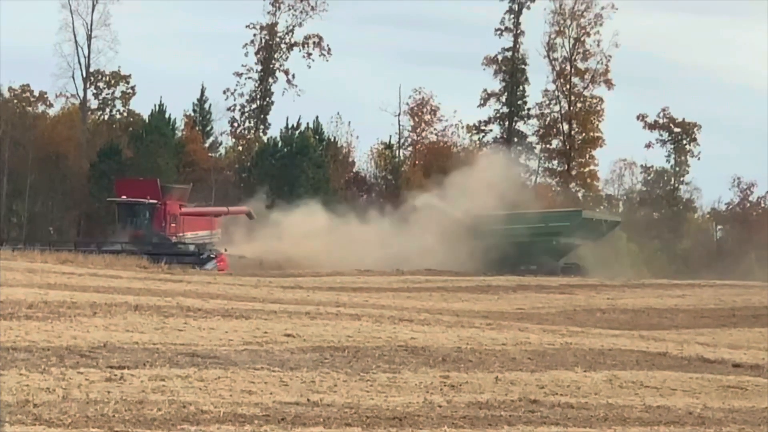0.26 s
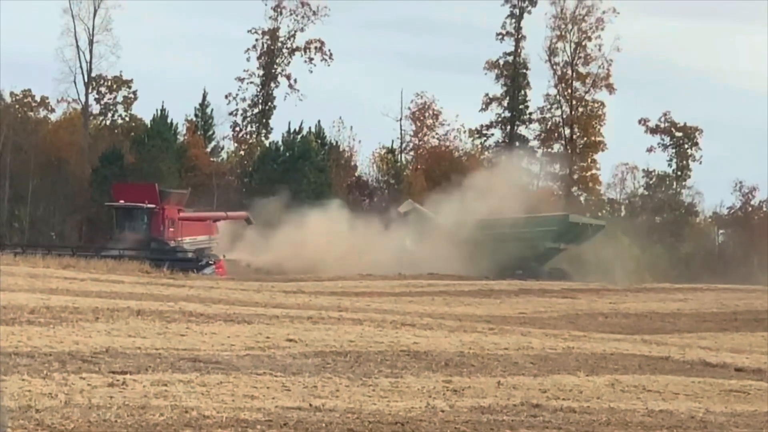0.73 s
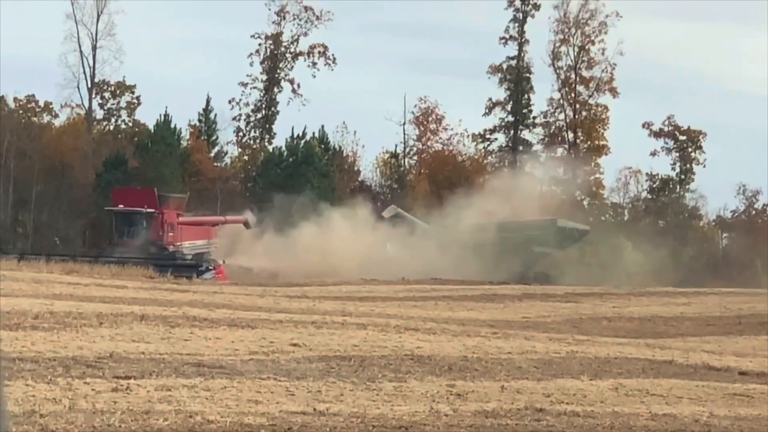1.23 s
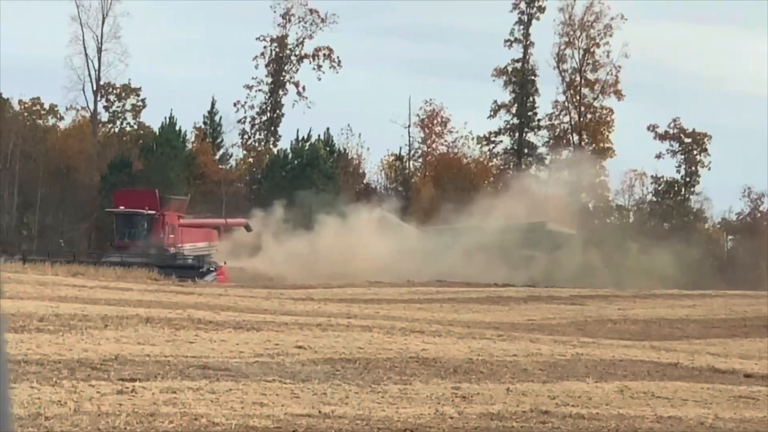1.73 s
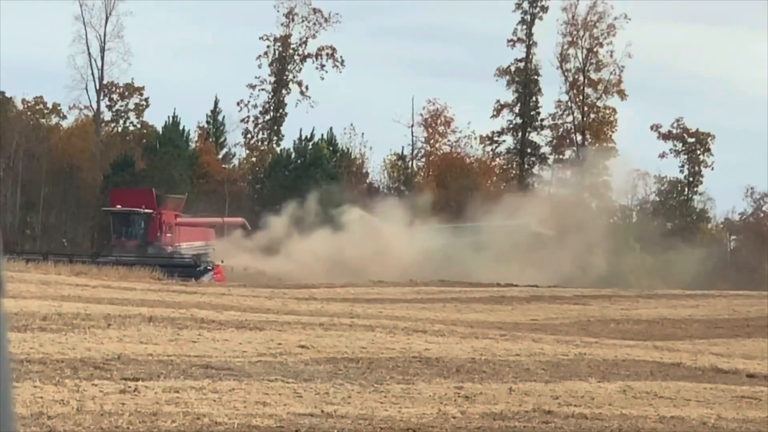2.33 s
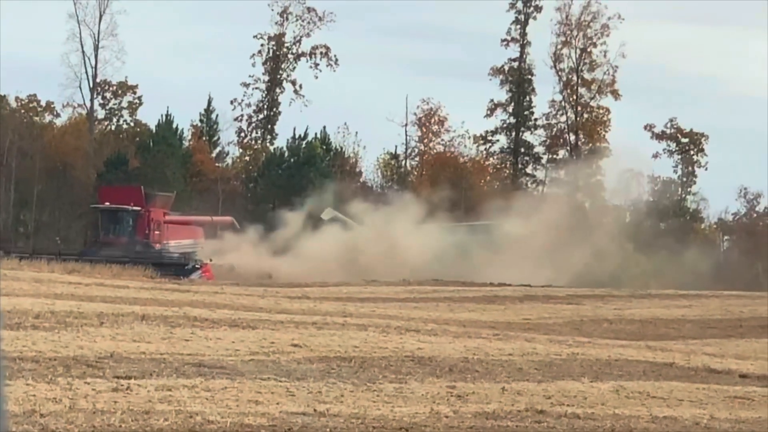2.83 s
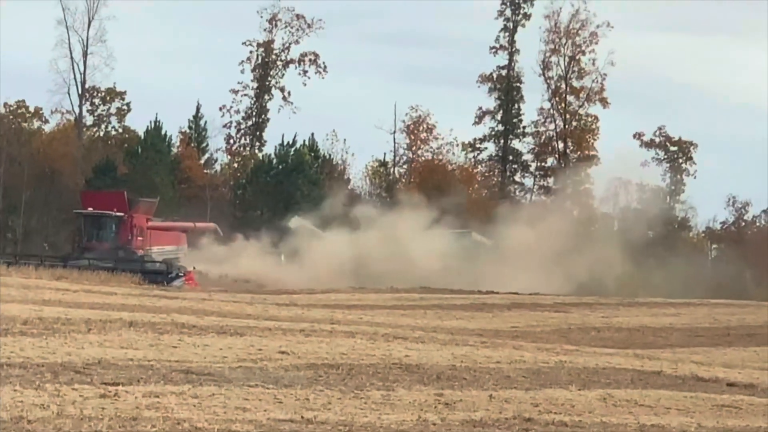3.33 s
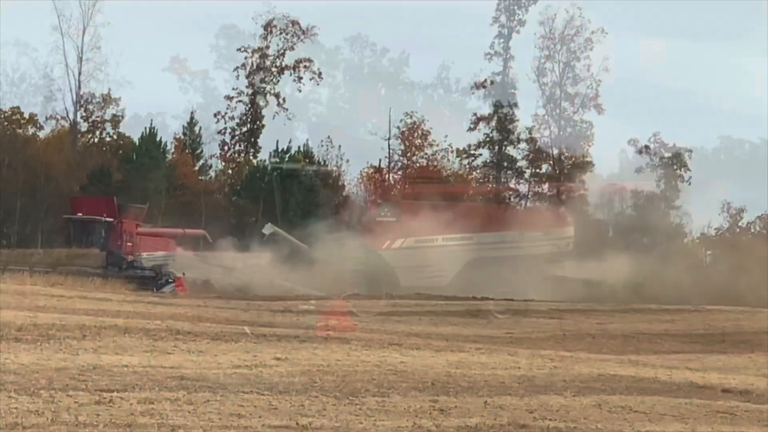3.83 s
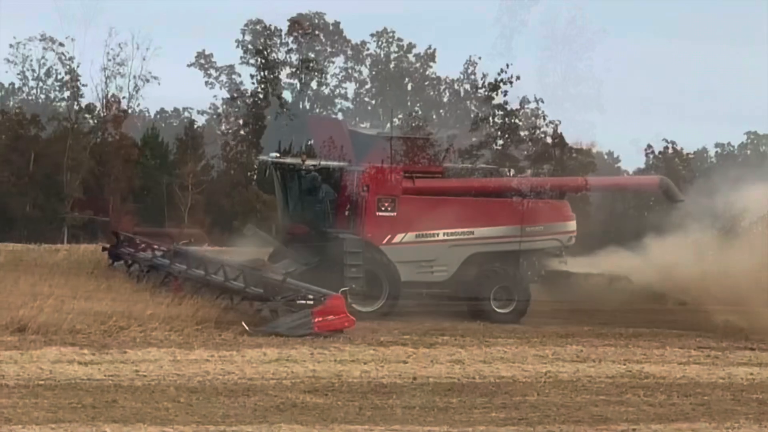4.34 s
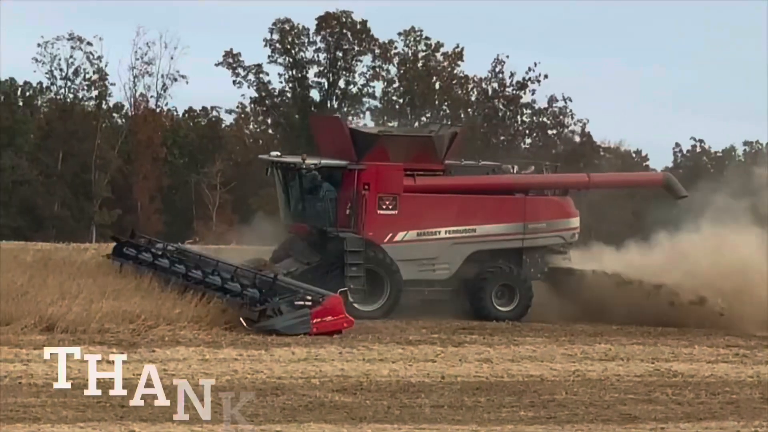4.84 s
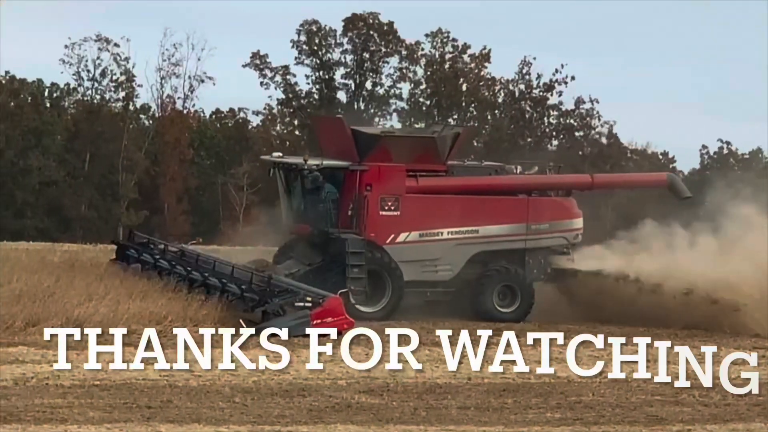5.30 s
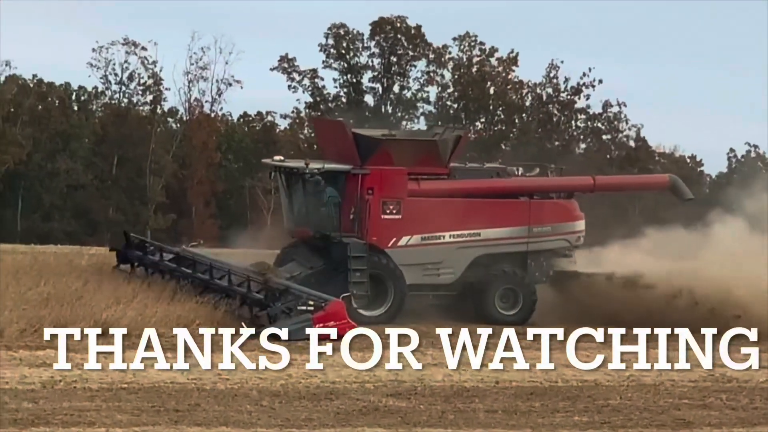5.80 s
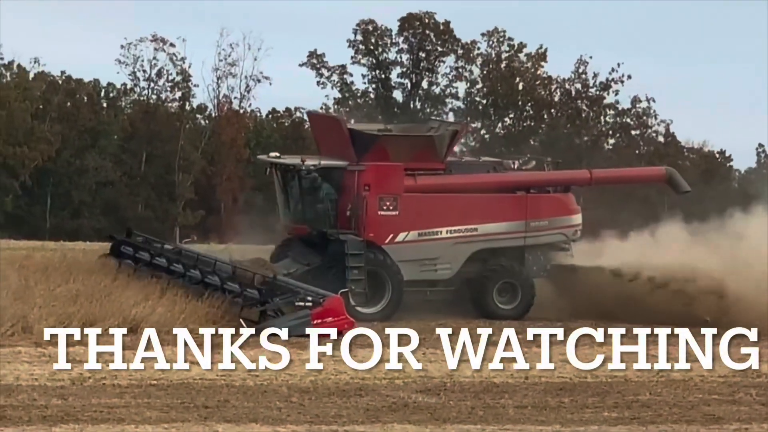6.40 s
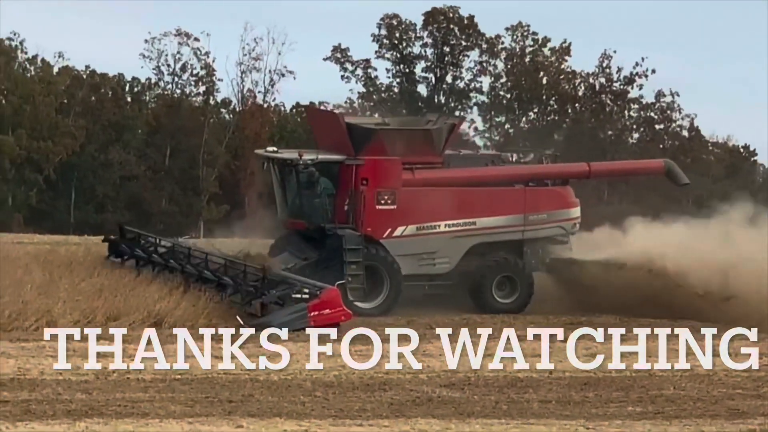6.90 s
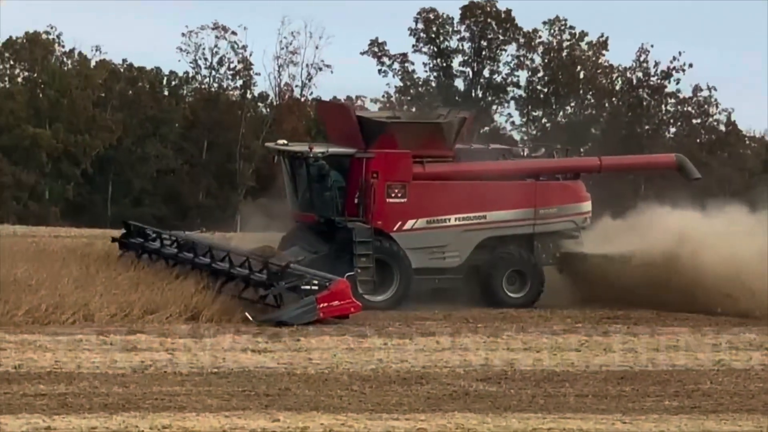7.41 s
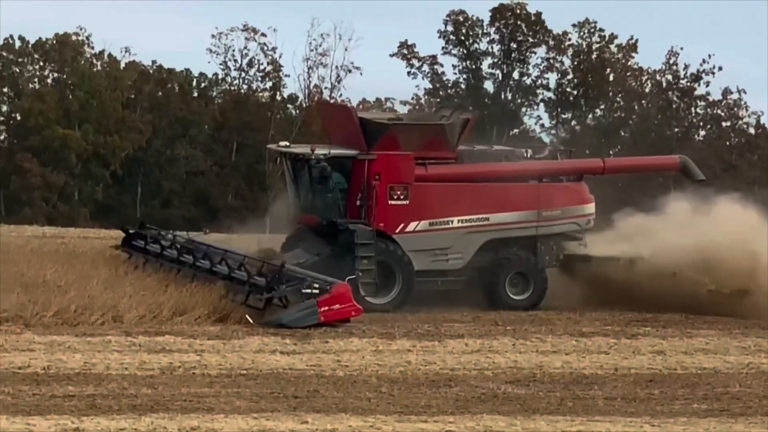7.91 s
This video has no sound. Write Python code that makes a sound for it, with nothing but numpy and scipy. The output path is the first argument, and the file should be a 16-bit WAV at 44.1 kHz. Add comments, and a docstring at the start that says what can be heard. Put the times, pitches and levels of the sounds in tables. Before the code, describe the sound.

Heard from across a field, a tractor and a combine harvester make a quiet, low drone with a faint whine and some barely audible clanks. The sound then blends smoothly into a combine working nearby, louder and fuller. Threshing roars over its steady engine hum, whining pump and booming metal panels, and chaff hisses with a slight, quick flutter until the end.

```python
"""First you hear a combine and a tractor droning far across a field: a low rumble, one engine tone,
a thin roar, a gear whine and a few faint clanks. They fade out as a combine close by swells in.
Its engine firing makes a stack of tones, its hydraulic pump whines and its panels boom. Threshing
roars, and shaking sieves make the rumble and the hiss of chaff pulse.
Left and right differ in level and timing, by an amount that changes with pitch."""
import sys
import numpy as np
from scipy import signal
from scipy.fft import rfft, irfft, next_fast_len
from scipy.io import wavfile
from scipy.ndimage import uniform_filter1d, map_coordinates

SR = 44100
rng = np.random.default_rng(int(sys.argv[2]) if len(sys.argv) > 2 else 0)


def output_pcm(signal):
    """Save a mono or channel-first signal as 16-bit PCM at the path in sys.argv[1].

    Samples are clipped to [-1, 1] before scaling.
    """
    pcm = np.clip(np.atleast_2d(signal).T, -1, 1) * 32767
    wavfile.write(sys.argv[1], SR, np.round(pcm).astype(np.int16))


N = 359415

# Far sounds carried by moving air. Each row: time in seconds, then tone, rasp, hiss and whine in dB.
FAR_LEVELS = [(0, -37, -55.5, -69.5, -71), (.55, -38.5, -58, -71.5, -77.5), (1.1, -41.5, -52.5, -67.5, -73),
              (1.75, -39.5, -57.5, -67.5, -77), (2.3, -45.5, -55.5, -66.5, -63.5),
              (2.85, -36.5, -58, -69, -70.5), (3.35, -46, -58.5, -66.5, -83), (3.8, -36.5, -52.5, -64, -82)]
# The tone colour of the far noises. Each row: frequency in Hz, relative level in dB.
FAR_RUMBLE_SHAPE = [(22, -26.5), (35, -20.5), (55, -5), (85, -2), (125, -2), (165, -10), (200, -16),
                    (230, -36.5), (300, -25.5)]
FAR_ROAR_SHAPE = [(200, -9.5), (300, -11), (450, -11), (740, -7.5), (830, -12), (1080, -7.5), (1220, -20.5),
                  (1400, -16), (1900, -16), (2370, -22.5), (2700, -26.5), (3400, -24.5), (4800, -35),
                  (6800, -40)]
# Ringing in the far roar. Each row: pitch in Hz, width in Hz, level in dB compared with the roar.
FAR_RINGING = [(470.6, 20, -13), (745, 30, -9.5), (1085, 19, -13.5), (1530, 34, -18), (1718, 44, -16),
               (1866, 50, -19.5), (2188, 39, -20), (2376, 120, -17), (2820, 50, -27.5), (2975, 40, -24),
               (3660, 200, -26), (4270, 170, -30)]
# Faint far clanks. Each row: start in seconds, level in dB, pitch in Hz.
FAR_CLANKS = [(2.151, -66, 3800), (2.68, -66, 4200), (3.021, -60, 4000), (3.117, -63, 4200)]
# The near engine's speed. Each row: time in seconds, firings per second.
FIRING_RATE = [(3.5, 146.2), (5.4, 146.2), (5.8, 147.4), (6.5, 146.2), (7.5, 146.8), (8.15, 147.2)]
# Tones of the near engine and its pump. Each row: multiple of the firing rate, level in dB.
ENGINE_TONES = [(1, -37.5), (3, -48), (4, -42.5), (5, -36.5), (6, -42), (7, -44.5), (8, -54), (9, -57),
                (21, -62.5)]
PUMP_TONES = [(5.3, -46), (10.6, -46)]
# Ringing panels and ducts. Each row: pitch in Hz, width in Hz, level in dB.
PANEL_RINGING = [(87.4, 8, -37), (122.9, 7, -35.5), (388.2, 4.5, -48.5), (426.6, 11, -50.5),
                 (642, 8.7, -52), (701, 12, -59), (1083, 9.8, -49), (1528, 24, -59), (1917, 50, -62),
                 (2018, 23.6, -55), (2263, 83, -47), (2365, 160, -49), (2660, 25, -70), (2706, 19, -57),
                 (2843, 13, -58), (4306, 60, -56.5)]
# The tone colour of the near noises. Each row: frequency in Hz, relative level in dB.
NEAR_RUMBLE_SHAPE = [(22, -38), (35, -10), (50, -3), (70, 3), (105, 1.5), (135, -4), (175, -5),
                     (225, -26.5), (300, -34)]
THRESHING_SHAPE = [(200, -17.5), (310, -12.5), (420, -6), (520, -7.5), (760, -2.5), (850, -6.5), (1050, -8),
                   (1220, -16), (1420, -23), (1520, -11.5), (1650, -16.5), (2000, -16.5), (2500, -19.5),
                   (3400, -21)]
CHAFF_SHAPE = [(2600, -14.5), (3500, -10), (4100, -1.5), (4650, -0.5), (4900, -7.5), (5300, -6),
               (7000, -15.5), (8200, -10), (8800, -17.5), (10000, -17), (11000, -23.5), (12000, -52),
               (13300, -24), (13900, -50)]
# How the two sides differ. Each row: frequency in Hz, left over right in dB, likeness from 0 to 1.
FAR_STEREO = [(60, 0, .99), (170, -.3, 1), (300, 2.5, .9), (1000, 5, .93), (1250, -.6, .83), (1500, -1, .7),
              (2200, -1, .87), (3000, .2, .7), (3600, -.7, .5), (5500, -3, .55), (7000, -.6, .55)]
NEAR_STEREO = [(60, -.6, .996), (500, -.2, .985), (1000, -2.7, .96), (1400, -2.3, .88), (1750, .4, .8),
               (2000, 4.7, .7), (2450, 3.1, .75), (2800, -2.1, .8), (4200, -.4, .92), (5500, -4.1, .55),
               (7000, -3.8, .6), (8500, -2.2, .6), (9900, 0, .97), (14000, 0, .97)]
# How far the left side runs ahead. Each row: frequency in Hz, phase lead in radians.
FAR_LEFT_LEAD = [(0, 0), (170, .15), (300, .8), (800, .8), (7240, 21.5)]
NEAR_LEFT_LEAD = [(0, 0), (1330, -.7), (1560, .6), (1950, 5.2), (2600, 4.6), (3000, 10.3), (3700, 13.2),
                  (5200, 14), (5850, 18.6), (6550, 18.9), (7150, 15.8), (8400, 18.8), (8700, 20.9),
                  (9400, 20.6), (9750, 18.85)]

FADE_START_S, FADE_END_S = 3.548, 4.455
FAR_RUMBLE_DB, FAR_ROAR_DB = -38.5, -52
FAR_FIRING_HZ, FAR_WHINE_HZ = 146.9, 2368
RUMBLE_DB, THRESHING_DB, CHAFF_DB = -30, -31.5, -41.5  # the near combine, once faded in
SIEVE_HZ = 7.8
FAINT_HISS_DB, TOP_HZ = -80, 14900


def amp(db):
    """Turn decibels into a number to multiply by."""
    return 10 ** (np.asarray(db) / 20)


def unit(x):
    """Scale a signal to an average (rms) level of 1."""
    return x / np.sqrt(np.mean(x ** 2) + 1e-20)


def over_pitch(table, hz):
    """Read a table's columns at these frequencies, on a log scale."""
    row_hz, *columns = np.transpose(table)
    return [np.interp(np.log(hz + 1), np.log(row_hz + 1), column) for column in columns]


def over_time(table):
    """Join a table's rows with straight lines, giving one value per sample."""
    seconds, *columns = np.transpose(table)
    return [np.interp(np.arange(N) / SR, seconds, column) for column in columns]


def wobble(rate):
    """A curve that slides to a new random value `rate` times a second."""
    points = rng.standard_normal(int(N * rate / SR) + 4)
    return map_coordinates(points, [np.arange(N) * rate / SR], order=1)


def filtered(x, response):
    """Multiply each frequency in x by response(hz)."""
    size = next_fast_len(N + 8192)
    return irfft(rfft(x, size) * response(np.fft.rfftfreq(size, 1 / SR)), size)[..., :N]


def rush(shape, patchy_db, end_hz):
    """Two rushing noises that share random louder and softer patches."""
    spectra = signal.stft(rng.standard_normal((2, N)), nperseg=512)[2]
    patches = uniform_filter1d(rng.standard_normal(spectra.shape[1:]), size=5, axis=0)
    patches = uniform_filter1d(patches, size=14, axis=1)
    pair = signal.istft(spectra * amp(patchy_db * unit(patches)), nperseg=512)[1][:, :N]
    edges = lambda hz: (hz > shape[0][0]) / (1 + (hz / end_hz) ** 60)
    return unit(filtered(pair, lambda hz: amp(over_pitch(shape, hz)[0]) * edges(hz)))


def ringing(bands, waver_db):
    """Two noises ringing in narrow bands, each band wavering in level."""
    def peak(pitch, width):
        return lambda hz: np.sqrt(SR / (width * np.pi / 2)) / (1 + (2 * (hz - pitch) / width) ** 2)
    return sum(amp(db + waver_db * wobble(1.49)) * filtered(rng.standard_normal((2, N)), peak(hz, width))
               for hz, width, db in bands)


def tones(hz, multiples, waver_db, drift):
    """Tones at multiples of a pulse rate; air and shaking make their level and phase waver."""
    phase = 2 * np.pi * np.cumsum(hz) / SR
    tone = sum(amp(db + waver_db * wobble(5)) * np.cos(multiple * phase + drift * wobble(4))
               for multiple, db in multiples)
    return np.sqrt(2) * tone * [[1], [0]]  # only in the signal both sides share


def stereo(pair, table, lead):
    """Both sides share signal one; signal two sets them apart. They also differ in level and timing."""
    def side(sign):
        def response(hz):
            tilt_db, likeness = over_pitch(table, hz)
            spread = np.arccos(np.clip(likeness, 0, 1)) / 2
            delay = np.exp(.5j * sign * np.interp(hz, *np.transpose(lead)))
            return amp(sign * tilt_db / 2) * delay * [np.cos(spread), sign * np.sin(spread)]
        return filtered(pair, response).sum(axis=0)
    return np.array([side(0.85), side(-1.141)])


def far_clanks(decay_s=.12, rise_s=.006):
    """Each blow is a soft burst of noise around its pitch."""
    out, t = np.zeros((2, N + SR)), np.arange(SR // 10) / SR
    for start, db, hz in FAR_CLANKS:
        band = signal.butter(4, [hz / 1.2, hz * 1.2], "bandpass", fs=SR, output="sos")
        burst = unit(signal.sosfilt(band, rng.standard_normal((2, len(t)))))
        envelope = amp(db - 60 * t / decay_s) * (1 - np.exp(-t / rise_s))
        out[:, round(start * SR):][:, :len(t)] += envelope * burst
    return out[:, :N]


def far_roar(rasp_db, hiss_db):
    """A thin roar: its low part holds while moving air shifts the threshing rasp and the hiss."""
    roar = rush(FAR_ROAR_SHAPE, patchy_db=1.8, end_hz=7000) + ringing(FAR_RINGING, waver_db=1.3)
    low, high = filtered(roar, lambda hz: hz < 1250), filtered(roar, lambda hz: hz > 3150)
    rasp = amp(rasp_db) * unit(roar - low - high)
    hiss = amp(hiss_db + 1.3 * wobble(16)) * unit(high)
    return amp(FAR_ROAR_DB) * unit(low) + rasp + hiss


def far_machines():
    """Distance leaves mostly the bass and the lowest engine tone."""
    tone_db, rasp_db, hiss_db, whine_db = over_time(FAR_LEVELS)
    roar = far_roar(rasp_db, hiss_db)
    rumble = amp(FAR_RUMBLE_DB + 1.3 * wobble(4)) * rush(FAR_RUMBLE_SHAPE, patchy_db=0.7, end_hz=284)
    engine = amp(tone_db) * tones(np.full(N, FAR_FIRING_HZ), [(1, 0)], waver_db=.8, drift=.25)
    gears = amp(whine_db) * tones(np.full(N, FAR_WHINE_HZ), [(1, 0)], waver_db=3, drift=4)
    return roar + rumble + engine + gears + far_clanks()


def chaff_hiss(shake):
    """Chaff hisses, fluttering as the sieves shake."""
    flutter = amp(.7 * shake + 1.3 * wobble(16))
    return amp(CHAFF_DB) * flutter * rush(CHAFF_SHAPE, patchy_db=1.5, end_hz=13900)


def threshing_roar(firing_hz):
    """Threshing roars, throbbing slightly each time the engine fires."""
    throb = 1 + 0.039 * np.cos(2 * np.pi * np.cumsum(firing_hz) / SR)
    level = amp(THRESHING_DB + 0.29 * wobble(6.4))
    return level * throb * rush(THRESHING_SHAPE, patchy_db=1.1, end_hz=3364)


def near_rumble(shake):
    """A deep rumble that pulses as the sieves shake."""
    level = amp(RUMBLE_DB + 1.04 * shake + 1.24 * wobble(5))
    return level * rush(NEAR_RUMBLE_SHAPE, patchy_db=0.5, end_hz=305)


def near_combine():
    """The engine and the pump geared to it hum over ringing panels and the noise of the work."""
    firing_hz = over_time(FIRING_RATE)[0]
    shake = np.sin(2 * np.pi * SIEVE_HZ * np.arange(N) / SR + 1.45 * wobble(3))
    engine = tones(firing_hz, ENGINE_TONES, waver_db=1.6, drift=.35)
    pump = tones(firing_hz, PUMP_TONES, waver_db=3.5, drift=1.6)
    panels = ringing(PANEL_RINGING, waver_db=1.5)
    return engine + pump + panels + near_rumble(shake) + threshing_roar(firing_hz) + chaff_hiss(shake)


def scene():
    """The far machines fade out as the near combine fades in."""
    fade = np.interp(np.arange(N) / SR, [FADE_START_S, FADE_END_S], [0, 1])
    far = stereo(far_machines(), FAR_STEREO, FAR_LEFT_LEAD)
    near = stereo(near_combine(), NEAR_STEREO, NEAR_LEFT_LEAD)
    return (1 - fade) * far + fade * near


def record(dry):
    """Faint hiss is added; the deepest bass and highest treble are cut."""
    hiss = amp(FAINT_HISS_DB) * rng.standard_normal((2, N))
    bass_cut = lambda hz: 1 / np.sqrt(1 + (33 / (hz + 1)) ** 8)  # falls away below about 33 Hz
    return filtered(dry + hiss, lambda hz: bass_cut(hz) * (hz < TOP_HZ))


dry = scene()
out = record(dry)
output_pcm(out)
```